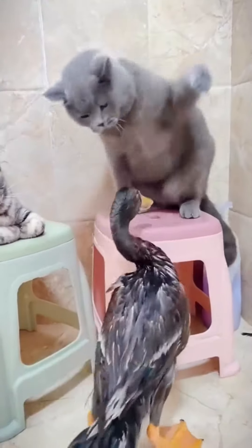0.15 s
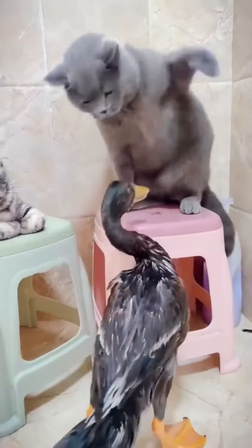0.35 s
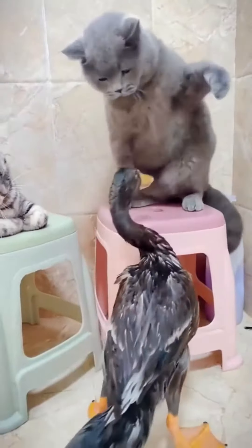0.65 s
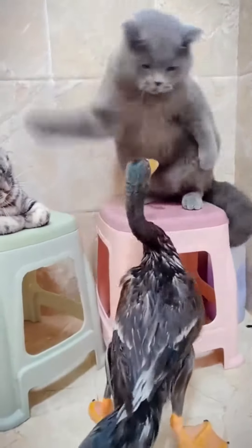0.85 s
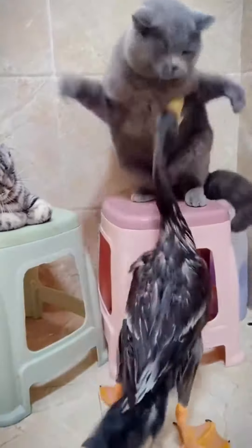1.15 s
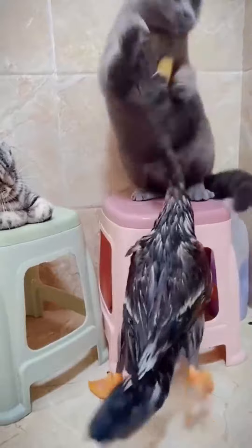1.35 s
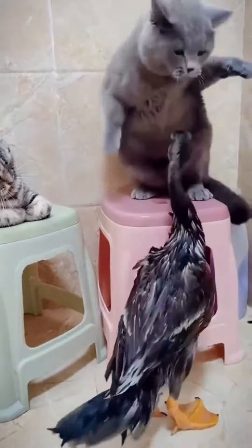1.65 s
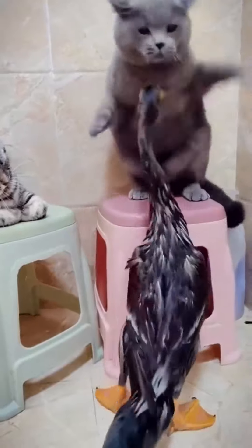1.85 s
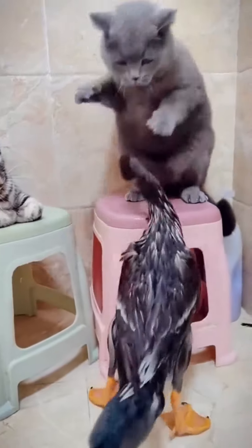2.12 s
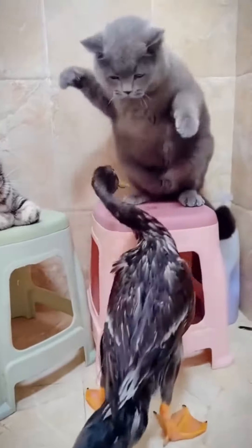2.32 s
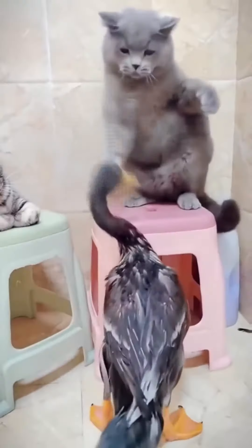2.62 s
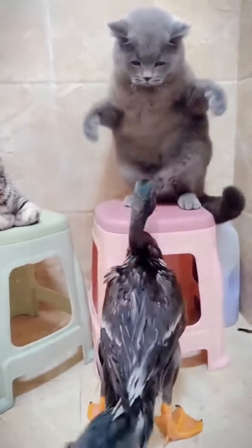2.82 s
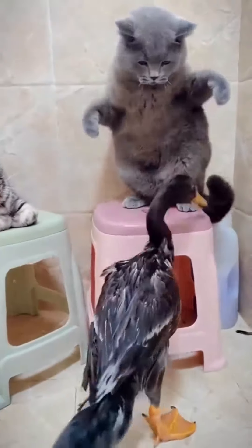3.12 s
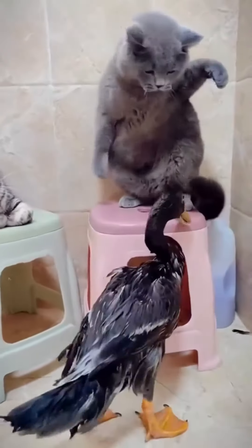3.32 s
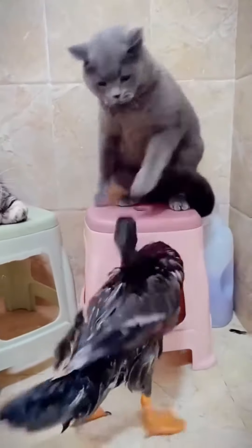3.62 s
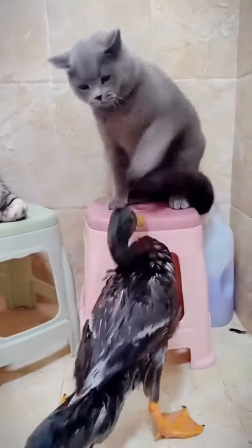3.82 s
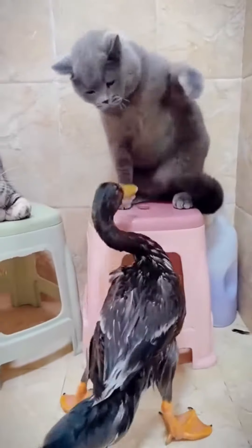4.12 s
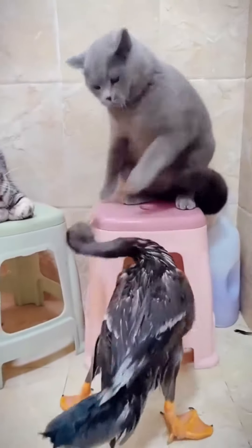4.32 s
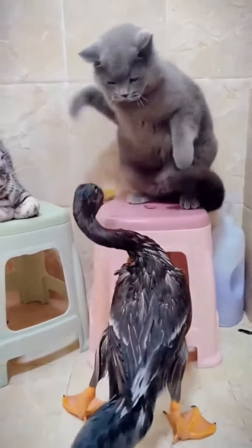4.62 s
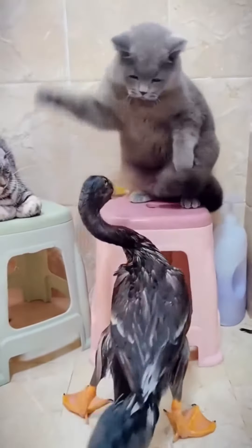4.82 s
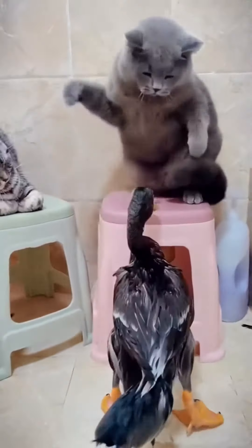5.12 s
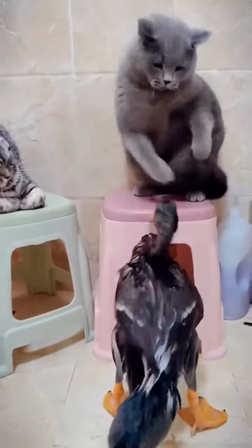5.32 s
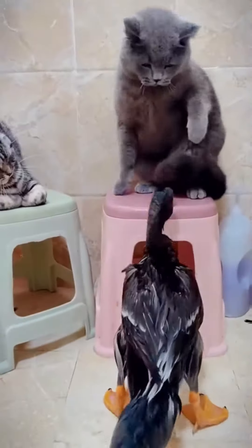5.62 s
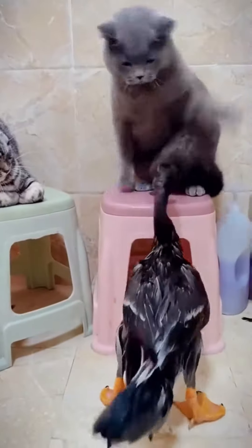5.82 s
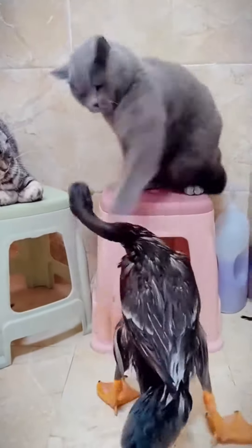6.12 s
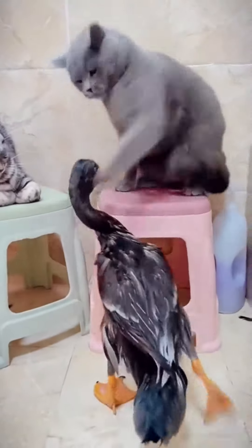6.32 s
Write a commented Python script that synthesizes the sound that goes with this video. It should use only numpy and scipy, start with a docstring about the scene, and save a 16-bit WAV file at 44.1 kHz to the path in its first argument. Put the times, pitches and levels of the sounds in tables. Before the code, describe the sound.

Light thumps and scuffs on plastic and tile start at once, then one clipped raspy quack. Feathery rustling follows, then spaced quacks mixed with hollow stool knocks, growing busier, with two hard clacks in the second half. Everything is close, with a short bright echo from tiled walls, faint hiss of moving bodies and a low floor rumble.

```python
"""Duck and cat sparring in a tiled room

A duck and a cat spar around a plastic stool in a small tiled room, near a small microphone.
Paws, bill and webbed feet knock the stool and slap the floor: ringing modes and a scuff of noise.
Fur and feathers rustle in clumps of tiny slips; the duck's short hoarse quacks are pulses and
puffs of air that ring its throat. The tiles answer with a brief bright tail of sparse echoes,
over room air, a faint hiss of shifting bodies and a low floor rumble, all shaped from noise."""
import sys
import numpy as np
from scipy import signal
from scipy.io import wavfile
from scipy.ndimage import uniform_filter1d

SR = 44100
rng = np.random.default_rng(int(sys.argv[2]) if len(sys.argv) > 2 else 0)


def file_out(sig):
    """Save sig as 16-bit WAV at sys.argv[1]."""
    # one column per channel
    cols = np.atleast_2d(sig).T
    # limit, then scale
    lim = np.clip(cols, -1, 1)
    pcm = np.round(lim * 32767).astype(np.int16)
    wavfile.write(sys.argv[1], SR, pcm)


N = 284791


def gain_of(db):
    """Turns dB into an amplitude factor."""
    return 10 ** (np.asarray(db) / 20)


def evened(x):
    """Scales to rms 1."""
    return x / np.sqrt(np.mean(x ** 2) + 1e-20)


def read(points, hz):
    """Reads a table of (Hz, value) on a log-frequency axis."""
    f, value = np.transpose(points)
    return np.interp(np.log(hz + 1), np.log(f + 1), value)


def follow(points, t):
    """Reads a table of (seconds, dB) at the times t, as a gain."""
    return gain_of(np.interp(t, *np.transpose(points)))


def add(mix, s, sound, pan_db=0.):
    """Lays a sound into both channels at s seconds; pan_db is left minus right."""
    part = mix[:, round(s * SR):][:, :sound.shape[-1]]
    part += gain_of([[pan_db / 2], [-pan_db / 2]]) * sound[..., :part.shape[1]]


def colour(points, size=2048):
    """Causal (minimum-phase) filter with the given dB response."""
    hz = abs(np.fft.fftfreq(2 * size, 1 / SR))
    log_gain = read(points, hz) * np.log(10) / 20
    return np.fft.ifft(np.exp(np.conj(signal.hilbert(log_gain)))).real[:size]


def resonate(x, hz, width):
    """One resonance that may glide: shifts hz down to zero, smooths, and shifts back."""
    turn = np.exp(2j * np.pi * np.cumsum(hz * np.ones(len(x))) / SR)
    r = np.exp(-np.pi * width / SR)
    return 2 * (turn * signal.lfilter([1 - r], [1, -r], x / turn)).real


def pair(z, hz, same):
    """Two channels from two random spectra with the given left-right likeness."""
    c = np.clip(read(same, hz), -1, 1)[:, None]
    return np.array([z[0], c * z[0] + np.sqrt(1 - c ** 2) * z[1]])


def patchy(points, patch_db):
    """Stereo noise of the given spectrum, whose level drifts in patches of time and pitch."""
    # How alike the room noise is left and right. Each row: frequency in Hz, likeness from 0 to 1.
    likeness = [(60, 0.29), (230, 0.44), (910, 0.27), (3530, 0.08), (13700, 0.19)]
    frames, hz = N // 256 + 5, np.fft.rfftfreq(1024, 1 / SR)
    a, b, c, d, patches = rng.standard_normal((frames, 513, 5)).T
    patches = evened(uniform_filter1d(uniform_filter1d(patches, 14, 0), 10, 1))
    z = pair([a + 1j * b, c + 1j * d], hz, likeness)
    z = z * gain_of(read(points, hz)[:, None] + patch_db * patches)
    return evened(signal.istft(z, nperseg=1024, noverlap=768)[1][:, :N])


def hum():
    """Steady room air, the hiss of shifting bodies, and a low rumble that follows the shuffling."""
    # Spectrum of the room air. Each row: frequency in Hz, relative level in dB per Hz.
    air_tone = [(12, -47), (20, -11), (32, -2), (70, -5), (260, -13.5), (313, -16), (442, -15.5),
                (597, -21.5), (905, -22.5), (1110, -32), (5000, -39), (6500, -46), (11000, -120)]
    # Shuffling weight felt through the floor. Each row: time in seconds, rms level in dB.
    rumble_level = [(0.0, -51), (0.45, -48), (0.7, -65), (1.11, -51), (1.69, -49.5), (1.98, -49),
                    (2.3, -60.5), (2.68, -59), (3.38, -72), (3.65, -46), (4.02, -58.5), (5.14, -59),
                    (5.34, -63), (6.11, -51.5), (6.31, -50), (6.45, -46.5)]
    # Faint hiss of bodies shifting. Each row: time in seconds, rms level in dB.
    stir_level = [(0.0, -35), (0.15, -58.5), (0.54, -45.5), (0.72, -57.5), (1.11, -54.5), (1.47, -49),
                  (1.62, -67), (1.81, -48.5), (2.06, -56), (2.84, -56), (3.0, -60.5), (4.06, -52),
                  (4.47, -59), (4.85, -64), (5.08, -50), (5.3, -65), (5.75, -60), (6.03, -50)]
    # Spectrum of that hiss. Each row: frequency in Hz, relative level in dB per Hz.
    stir_tone = [(500, 8), (1500, 1), (3000, 2.2), (7000, -3.5), (11000, -6), (13200, -12.5), (14200, -72)]
    air_db = -52.5  # rms
    t = np.arange(N) / SR
    band = signal.butter(3, [62, 170], "band", fs=SR, output="sos")
    low = signal.sosfilt(band, rng.standard_normal((2, N)))
    low = evened(low + 0.71 * low[::-1])  # much of the rumble is shared left and right
    rumble = low * follow(rumble_level, t)
    stir = patchy(stir_tone, patch_db=2.5) * follow(stir_level, t)
    return gain_of(air_db) * patchy(air_tone, patch_db=1.54) + stir + rumble


def tail():
    """Sparse echoes of random sign from 3 ms on, each band dying at its own speed."""
    # How long the tiles ring. Each row: frequency in Hz, time to fall 60 dB in seconds.
    decay = [(100, 1), (300, 0.73), (1000, 0.3), (3000, 0.33), (8000, 0.36), (14000, 0.19)]
    # How much the tiles return. Each row: frequency in Hz, relative level in dB.
    returned = [(100, -6), (400, -7.5), (900, -5.5), (1800, 0.5), (5000, -1.3), (13000, -1.5)]
    # How alike the tail is left and right. Each row: frequency in Hz, likeness from 0 to 1.
    likeness = [(100, 1), (400, 0.67), (1200, 0.022), (10000, 0.041)]
    taps = np.zeros((2, SR))
    starts = np.arange(130, SR - 20, 20)  # one echo somewhere in every 20 samples
    at = starts + rng.integers(0, 20, (2, len(starts)))
    np.put_along_axis(taps, at, rng.choice([-1., 1.], at.shape), 1)
    hz, t, z = signal.stft(taps, SR, nperseg=256)
    t60 = read(decay, hz)[:, None]
    fading_db = read(returned, hz)[:, None] - 60 * t / t60
    z = pair(z, hz, likeness) * gain_of(fading_db) / np.sqrt(t60)
    answer = signal.istft(z, SR, nperseg=256)[1]
    return answer / np.linalg.norm(answer[0])


def tiles(x, count=3):
    """The room's answer is shared among slowly alternating random tails, for a smooth, even decay."""
    turn = 2 * np.pi * 2.3 * np.arange(N) / SR
    answer = 0
    for k in range(count):
        share = np.sqrt(2 / count) * np.cos(turn + np.pi * k / count)
        answer = answer + signal.fftconvolve((x * share)[None], tail(), axes=1)[:, :N]
    return answer


def rustle(peak_s, db, rise, fall, bright_db):
    """Dense tiny slips, as of hair and feather, in clumps, with a few sharper ticks."""
    # Spectrum of the rubbing. Each row: frequency in Hz, relative level in dB per Hz.
    rub_tone = [(240, -36.5), (400, -1.5), (882, -4), (1090, -2.5), (1490, -3.5), (2870, -2.5),
                (3590, -5.5), (10400, -12.5), (14200, -21.5)]
    in_db, out_db = -16, -25.5  # a stroke starts and ends this far under its strongest moment
    t = np.arange(0, rise + fall, 1 / SR)
    level_db = db + np.interp(t, [0, rise, rise + fall], [in_db, 0, out_db])
    hair, clumps, size = rng.standard_normal((SR // 2, 3))[:len(t)].T
    ticks = 9 * size * (rng.random(SR // 2)[:len(t)] < 120 / SR)  # about 120 a second
    slips = (hair + ticks) * gain_of(1.3 * evened(uniform_filter1d(clumps, 250)))
    rub = evened(signal.fftconvolve(slips, colour(rub_tone))[:len(slips)])
    high = signal.sosfilt(signal.butter(2, 4000, "high", fs=SR, output="sos"), rub)
    rub += (gain_of(bright_db) - 1) * high
    return peak_s - rise, gain_of(level_db) * rub


def blow(knock_db, knock_hz, boom_db, thump_db, thump_hz, hollow_db, scuff_db, bright_db, contact, ring):
    """The modes near each struck region ring unsteadily; the contact itself scuffs."""
    # What the stool and the small room ring with when struck. Each row: frequency in Hz, relative
    # level in dB, time to fall 60 dB in seconds at a ring factor of 1.
    listed = np.array([(97.2, 4.5, 0.33), (124, -34, 0.21), (162, 17, 0.24), (203.2, 4.5, 0.17),
                       (221, 6.5, 0.5), (263.9, 1.5, 0.56), (337.5, 5.5, 0.24), (380.7, 1, 0.17),
                       (422, 9.5, 0.073), (448.9, -1, 0.39), (482.6, -4, 0.29), (572, 0, 0.23),
                       (633, -5.5, 0.43), (686.4, 0.5, 0.13), (777, 1, 0.15), (840, -3, 0.092),
                       (896, -9.5, 0.033), (939, 12, 0.033), (1144, 13, 0.03), (1362, 5.5, 0.11),
                       (1459, 5.5, 0.035), (1556, 15, 0.011), (2034, -0.5, 0.051), (2707, -12, 0.045),
                       (3476, -9.8, .1), (4130, 4.5, 0.02)])
    # Tone of the scuff before its brightness tilt. Each row: frequency in Hz, relative level in dB.
    scuff_tone = [(200, -23), (700, 10), (2000, 0.3), (5000, -0.5), (9000, -6.5), (14000, -15)]
    boom_hz, hollow_hz, rattle_hz = 96, 410, 2780  # where floor, hollow and rim answer
    rattle_db = scuff_db - 15  # the rim rings under the scuff
    t = np.arange(SR // 4) / SR

    # many weak, quickly lost modes lie between the listed ones
    weak_hz = 90 * 2 ** (np.arange(40) / 8 + rng.uniform(0, 1 / 8, 40))
    hz = np.r_[listed[:, 0], weak_hz][:, None]
    db = np.r_[listed[:, 1], np.full(40, -4.5)][:, None]
    t60 = ring * np.r_[listed[:, 2], 2.2 / np.sqrt(weak_hz)][:, None]

    regions = [(knock_db, knock_hz, .5), (boom_db, boom_hz, .35), (thump_db, thump_hz, .35),
               (hollow_db, hollow_hz, .25), (rattle_db, rattle_hz, .9)]  # (dB, Hz, width in octaves)
    strength = sum(gain_of(d) * np.exp(-(np.log2(hz / f) / octaves) ** 2) for d, f, octaves in regions)
    phase = rng.uniform(0, 2 * np.pi, hz.shape)
    # each mode reaches the two microphone ports differently
    phase = phase + 0.31 * rng.standard_normal((2, *hz.shape))
    # each ring wavers in strength on its own
    steps = rng.standard_normal((len(hz), len(t) // 400 + 2))
    waver = np.array([np.interp(t * SR / 400, np.arange(len(row)), row) for row in steps])
    rings = (1 + 0.69 * waver) * np.exp((2j * np.pi * hz - np.log(1000) / t60) * t)
    weights = (strength * gain_of(db) * np.exp(1j * phase))[..., 0]
    modes = (weights @ rings).imag * np.sqrt(1 - t / t[-1])
    struck = modes * (1 - np.exp(-t / (0.19 * contact)))  # a longer contact starts more softly

    roughness = uniform_filter1d(rng.exponential(1, len(t)), 30)
    grain = rng.standard_normal(len(t)) * gain_of(1.3 * roughness)
    # hard claws are brighter than soft pads
    tone = [(f, d + bright_db * np.log2(f / 4000)) for f, d in scuff_tone]
    scuff = evened(signal.fftconvolve(grain, colour(tone))[:len(t)]) * np.exp(-t / contact)
    return struck + gain_of(scuff_db) * scuff * (1 - np.exp(-t / 0.0017))


def quack(pop_db, pop_hz, swell, effort_db, fade_db_per_s, hz, low_db):
    """The bill pops; uneven pulses that throb in strength, mixed with puffs of air, ring the throat."""
    # Throat resonances. Each row: ratio to the main resonance, width in Hz of the first of two
    # passes, relative level in dB.
    throat_modes = [(.6, 130, -7), (.79, 150, -7), (1.0, 130, 0), (1.12, 150, -13), (1.26, 160, -9),
                    (1.52, 220, -14), (2.3, 1800, -27)]
    # after the pop the voice murmurs, bursts in, holds, then fades out
    swell_db, hold_s, fade_db = 8.5, .03, 30.5
    pop_s = .0008  # how long the pop swells
    overtone = 5  # the main resonance settles on this multiple of the mean pulse rate
    t = np.arange(0, swell + hold_s + fade_db / fade_db_per_s, 1 / SR)
    murmur_db = swell_db * (1 - (t / swell) ** 4)
    faded_db = fade_db_per_s * np.maximum(t - swell - hold_s, 0)
    level_db = effort_db - np.where(t < swell, murmur_db, faded_db)

    wobble, air, force, drift = rng.standard_normal((SR // 4, 4))[:len(t)].T
    pulse_hz = hz / overtone * (1 + .07 * evened(uniform_filter1d(wobble, 200)))
    turns = np.cumsum(pulse_hz) / SR
    pulses = np.diff(np.floor(turns), prepend=0) * gain_of(1.5 * force)
    puffs = (1.2 + np.exp(-(turns % 1) / 0.16)) * air  # strongest just after each pulse
    # a slower flutter of the membranes, cresting near the end of the swell
    flutter_hz = 65 * (1 + 0.17 * evened(uniform_filter1d(drift, 400)))
    beats = np.cumsum(flutter_hz) / SR - 65 * (swell + 0.0049)
    throb = gain_of(5 * np.cos(2 * np.pi * beats))
    drive = (.6 * evened(pulses) + .5 * evened(puffs)) * throb

    opening_hz = hz * (1 - 0.44 * np.exp(-t / 0.009))  # the resonances rise as the bill opens
    throat = 0
    for k, (ratio, width, db) in enumerate(throat_modes):
        gain = (-1) ** k * gain_of(db + low_db * (ratio < 1))
        once = resonate(drive, ratio * opening_hz, width)
        throat = throat + gain * resonate(once, ratio * opening_hz, 3.2 * width)
    voice = gain_of(level_db) * evened(throat) * np.minimum(t / 0.0022, 1)
    pop = t / pop_s * np.exp(1 - t / pop_s) * np.sin(2 * np.pi * pop_hz * t)
    return voice + gain_of(pop_db) * pop


def scene():
    """The duck's voice and the scuffle, their tails, and the room's own noise."""
    # Quacks, levels before the mix. Each row: bill opens in seconds, pop in dB, pop in Hz, swell in
    # seconds, effort in dB, fade in dB per second, main throat resonance in Hz once the bill is open,
    # extra level of the resonances below it in dB.
    quacks = [(0.575, -32, 1170, .021, -31, 1097, 1916, 0), (2.779, -31, 1010, 0.018, -36, 595, 1744, 2),
              (3.019, -60, 1000, 0.014, -48.5, 349, 1703, 5), (3.37, -29, 1130, 0.019, -39, 395, 1440, -4),
              (4.101, -28, 940, .021, -34.5, 353, 1813, 0), (4.534, -28.5, 960, 0.016, -35, 695, 1802, 0.5),
              (5.011, -25, 1040, 0.0234, -31, 500, 1885, 4.5),
              (5.213, -58, 1000, 0.011, -42.5, 350, 1654, 1),
              (6.107, -49.5, 860, 0.017, -34.5, 699, 1699, -4.5)]
    # Blows on stool and floor, levels before the mix. Each row: start in seconds, knock in dB, knock
    # in Hz, boom in dB, thump in dB, thump in Hz, hollow in dB, scuff in dB, scuff brightness in dB
    # per octave, contact in seconds, ring length as a factor, left minus right in dB.
    blows = [(0.001, -38, 934, -36.5, -28, 247, -29.5, -15, -2, 0.0032, 0.54, 1.5),
             (0.029, -36, 740, -39, -24, 279, -36.5, -33, -.8, 0.012, 0.32, -1),
             (0.158, -44.5, 1180, -63, -53, 263, -46, -33, -3, 0.008, 1.2, 1),
             (0.223, -35.5, 750, -67, -44, 212, -41.5, -26, -3.3, 0.0038, .95, 2.5),
             (0.456, -27, 540, -40, -35, 215, -39, -21, 1.5, 0.0056, 0.51, 1),
             (0.898, -33.5, 660, -42.5, -31.5, 259, -29.5, -17.5, 2.5, 0.0041, 0.35, 2.5),
             (1.046, -47, 1280, -67, -64, 229, -63, -35, 18, 0.0037, 0.28, 4),
             (1.222, -33.5, 706, -49.5, -34.5, 206, -41.5, -30, 3, 0.004, 0.38, 0.5),
             (1.344, -51, 705, -40, -50, 150, -51, -50, 1, 0.0028, 0.27, 2),
             (1.819, -52, 680, -61, -60, 182, -48.5, -28.5, 9, 0.0034, 0.82, 5),
             (1.939, -42, 573, -39, -49.5, 206, -45, -34.5, -0.3, 0.012, 1.05, 2.5),
             (2.615, -45.5, 593, -36.5, -57, 151, -43, -55, 9.9, .005, 0.5, 3),
             (3.161, -31.5, 640, -73, -51, 308, -25.5, -27.5, 12.5, 0.0051, 0.92, 1.5),
             (3.174, -30.5, 800, -82, -50, 261, -23.5, -23.5, 4, 0.0012, 0.53, 1),
             (3.568, -47.5, 1250, -38, -43, 227, -38, -41, -5, 0.0062, 1.5, -1),
             (3.609, -22, 840, -41.5, -30.5, 267, -30, -13.5, -1.5, 0.0067, 0.78, 0),
             (3.784, -38, 740, -53.5, -46.5, 220, -45, -30, 2, 0.0047, 1.66, 1),
             (3.958, -31.5, 616, -40.5, -33.5, 204, -36, -19.5, -0.4, 0.005, 0.43, 1.5),
             (4.25, -33.5, 950, -46, -41, 150, -39, -24, 1.5, 0.004, 0.84, 1),
             (4.284, -14.5, 855, -56.5, -26, 310, -31, -4.5, -2, 0.0064, 1.01, 4),
             (4.291, -16.5, 830, -54, -34.5, 154, -25.5, -6, -2.5, 0.00057, .55, -2),
             (4.304, -19.5, 860, -57, -25, 296, -40, -29, -4, 0.0058, 0.55, 2),
             (4.454, -65, 767, -50.5, -40, 262, -31.5, -60, -3, 0.004, 0.9, 1),
             (4.486, -46.5, 790, -66, -43.5, 191, -42, -55, .1, .003, .59, -1),
             (4.887, -37.5, 870, -38, -44.5, 268, -39.5, -35.5, 2, 0.0037, 0.73, 4),
             (5.258, -46.5, 1010, -41, -52, 256, -46, -33, 0, 0.0061, 0.56, 2.5),
             (5.856, -44, 738, -80, -30, 298, -29, -21.5, -.3, 0.0077, 0.44, 0),
             (5.867, -11, 956, -58, -28.5, 312, -16, -4.5, -0.7, 0.0045, 0.64, 1.5),
             (5.883, -49, 794, -66, -20, 268, -22, -27, 9.5, 0.016, 0.85, -1),
             (6.171, -47.5, 640, -27.5, -29, 248, -30, -27.5, -7.5, 0.011, 0.81, -.5),
             (6.325, -34.5, 704, -51, -57, 210, -34, -27, -1.5, 0.0055, 0.61, 2.5)]
    # Strokes of fur and feathers, and one short dull scrape leading into the blow at 4.284 s; levels
    # before the mix. Each row: strongest moment in seconds, level in dB, rise in seconds, fall in
    # seconds, brightness in dB above about 4 kHz.
    strokes = [(0.252, -42.5, .11, 0.063, 4), (1.048, -28, .012, 0.049, 2), (1.234, -44.5, .005, 0.12, 2.5),
               (1.342, -40, 0.052, 0.065, 4), (1.392, -41.5, 0.021, 0.057, 12.5),
               (1.498, -40, .02, 0.19, -4), (1.6, -48.5, 0.11, 0.053, 12.5),
               (1.774, -43, 0.047, 0.047, 5.5), (1.822, -38.5, 0.035, 0.025, 2),
               (1.94, -46, 0.067, 0.21, 0), (2.508, -55, 0.092, 0.059, 10.5), (2.616, -47, 0.014, 0.077, 1),
               (3.572, -31.5, 0.0068, 0.17, -0.5), (3.789, -36, .005, 0.088, 0),
               (4.122, -42, 0.023, 0.058, -11.5), (4.257, -47, .003, 0.044, 8.5),
               (4.279, -20, .006, 0.01, -19), (4.892, -44, .004, 0.24, 5),
               (4.946, -36.5, 0.0053, 0.045, -1.5), (5.26, -44.5, .03, 0.17, 3.5),
               (6.16, -53.5, 0.038, 0.086, 17.5)]
    voice, scuffle = np.zeros((2, 2, N))
    for s, *call in quacks:
        add(voice, s, quack(*call), pan_db=1.5)
    for s, *touch, pan_db in blows:
        add(scuffle, s, blow(*touch), pan_db)
    for stroke in strokes:
        add(scuffle, *rustle(*stroke), pan_db=0.8)
    answer = tiles((gain_of(-5) * voice + scuffle).mean(0))  # the duck is nearer than the walls
    direct = gain_of(-4.0) * (voice + scuffle)
    return direct + gain_of([[-.9], [-2.1]]) * answer + hum()


def record(dry):
    """The small microphone loses the deepest bass and rounds the highest peaks; then the band limit."""
    edge_hz = 14250
    thin = signal.sosfilt(signal.butter(2, 38, "high", fs=SR, output="sos"), dry)
    rounded = .95 * np.tanh(thin / .95)
    band_limit = signal.firwin(511, edge_hz, window=("kaiser", 9), fs=SR)
    return signal.oaconvolve(rounded, band_limit[None], "same")


dry = scene()
out = record(dry)
file_out(out)
```